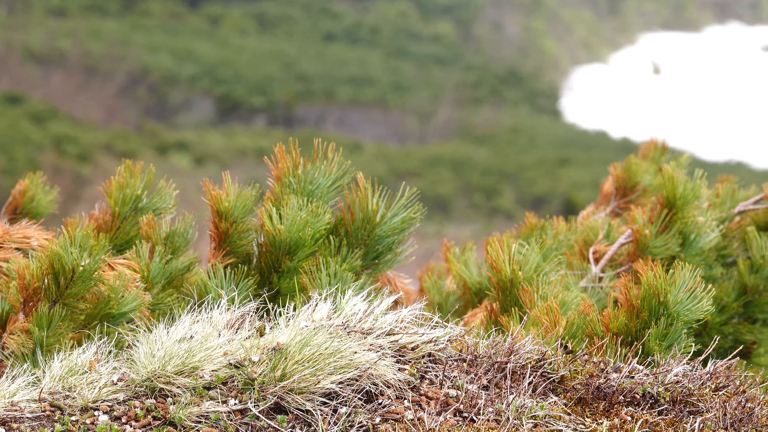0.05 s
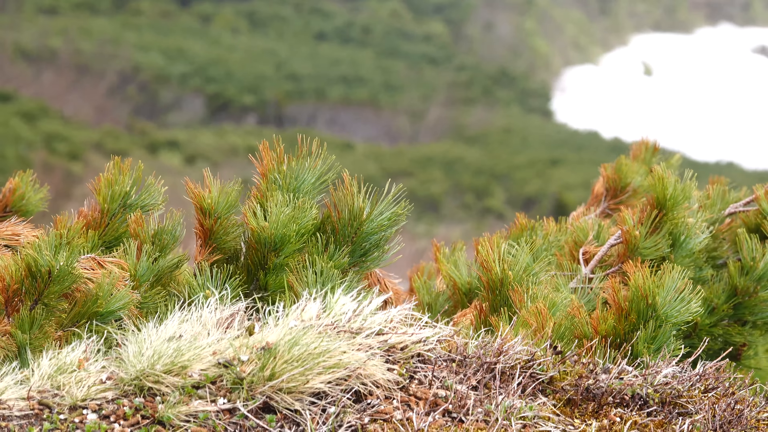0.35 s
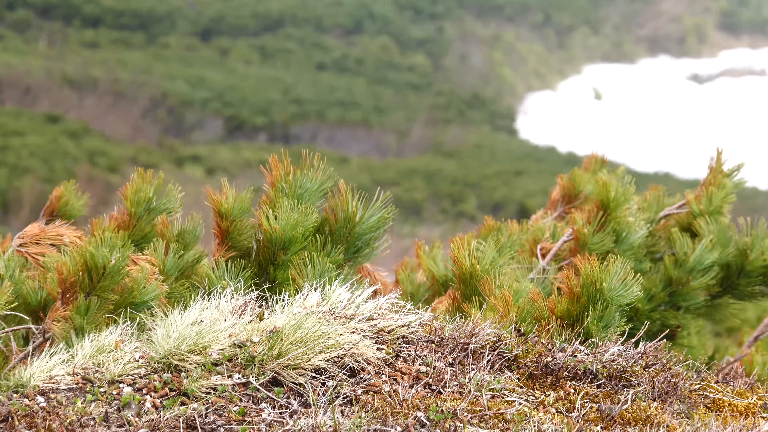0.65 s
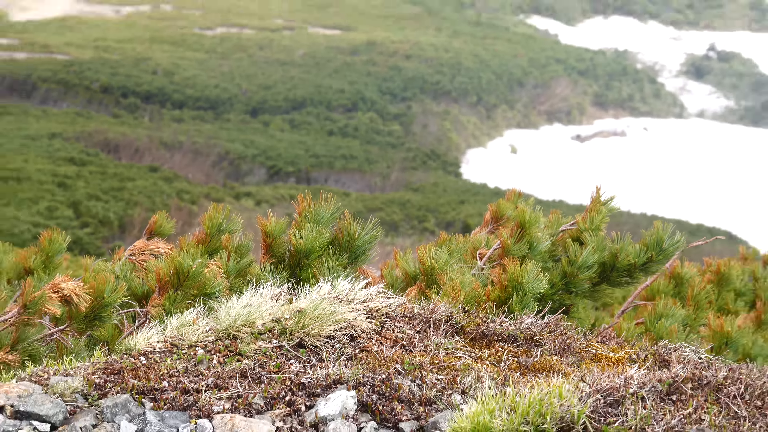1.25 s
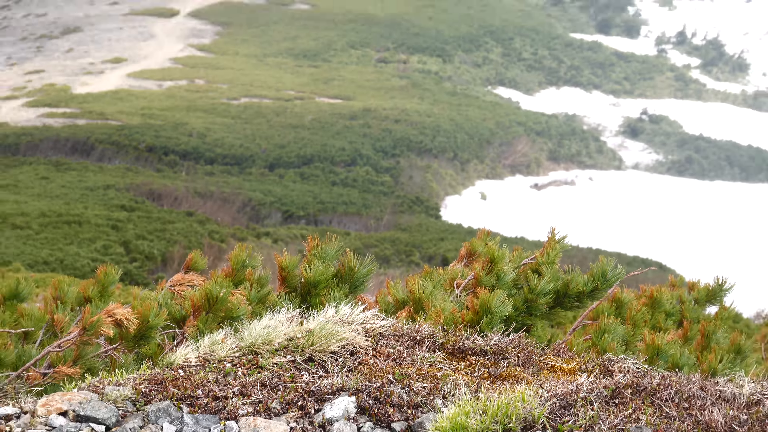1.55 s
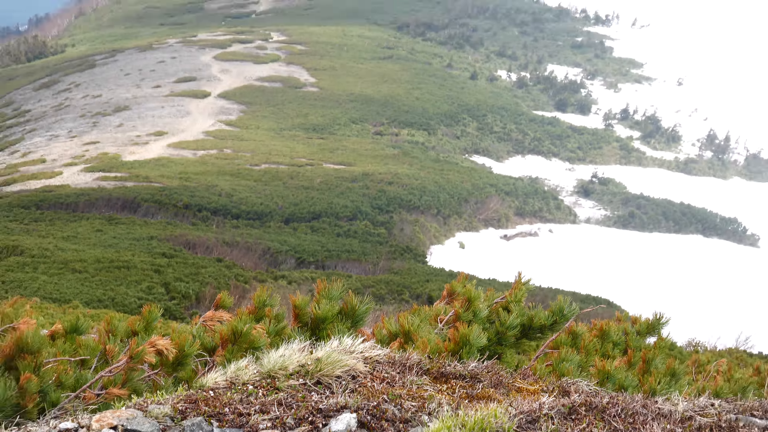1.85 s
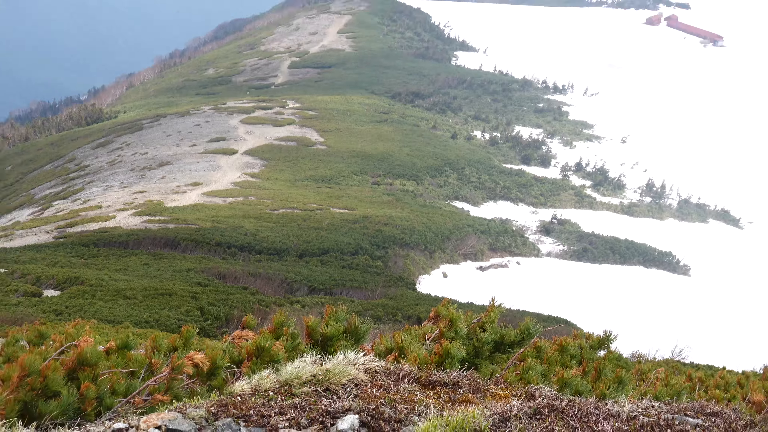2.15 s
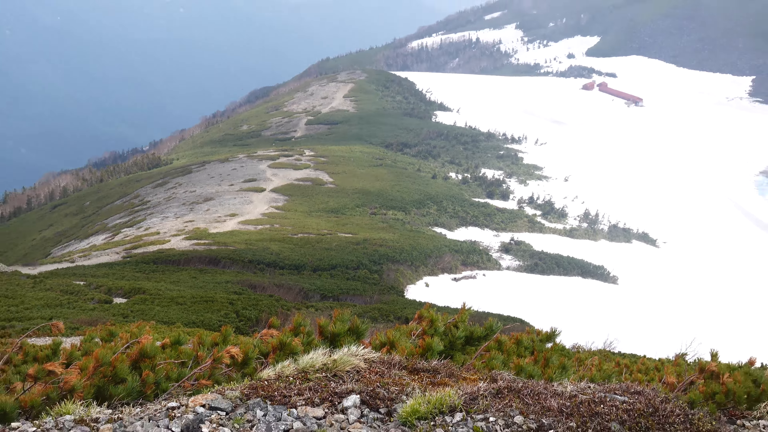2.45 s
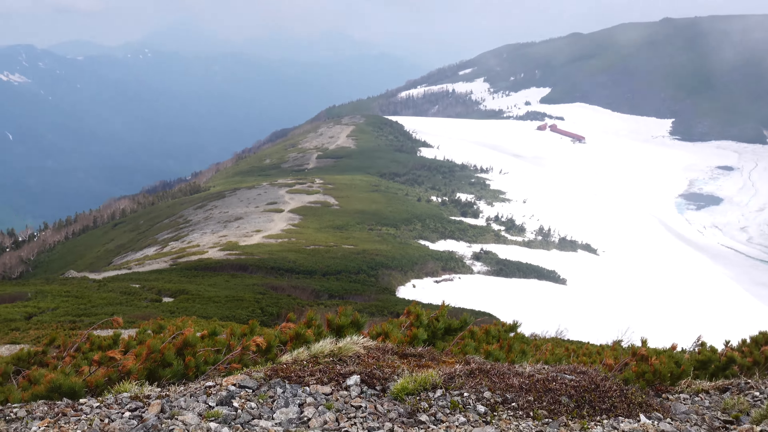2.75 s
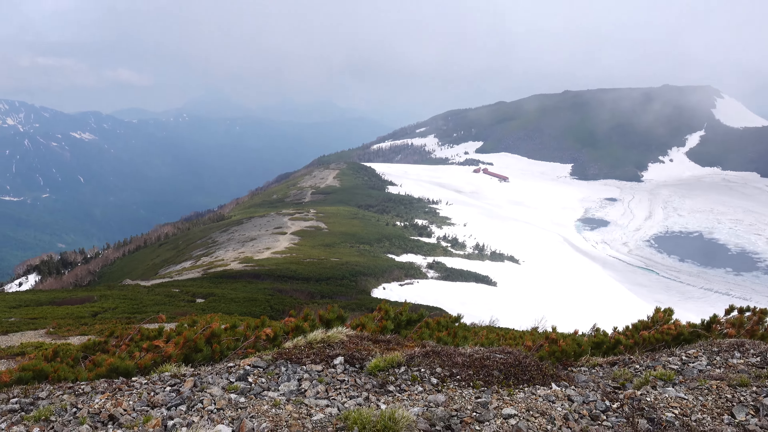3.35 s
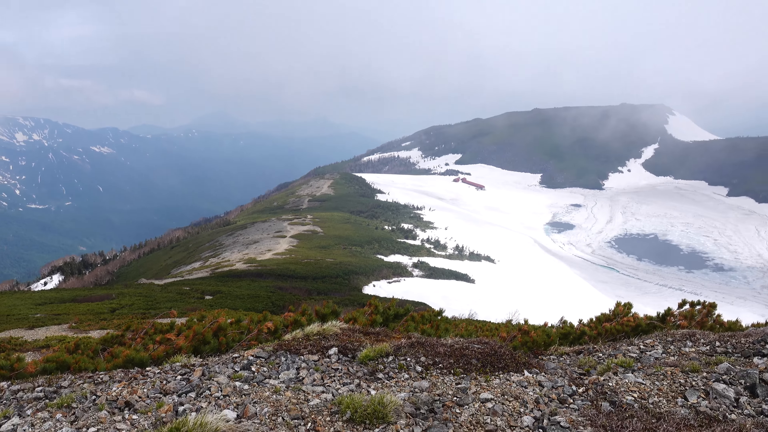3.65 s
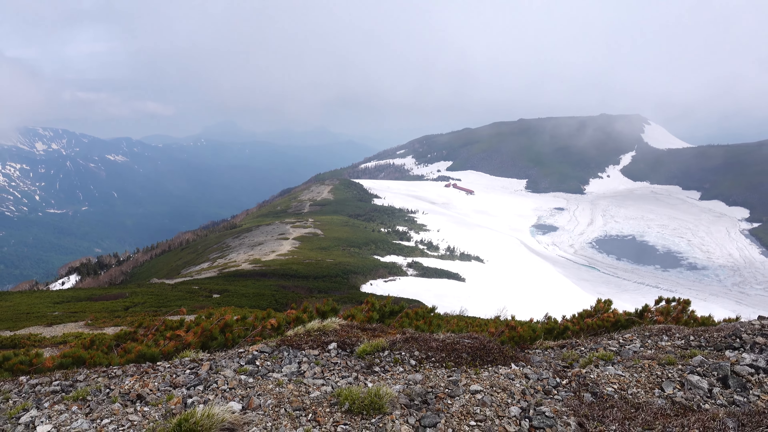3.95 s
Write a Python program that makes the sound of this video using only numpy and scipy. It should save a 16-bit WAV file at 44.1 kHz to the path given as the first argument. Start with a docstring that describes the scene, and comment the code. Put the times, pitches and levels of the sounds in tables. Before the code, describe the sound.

A ptarmigan close to the microphone gives four dry, rattling croaks on a mountain slope, while a far songbird whistles faintly among them. Afterwards only light wind and the hiss of distant water remain.

```python
"""A ptarmigan close by gives four dry, rattling croaks on a mountain slope: pulse trains that excite the
resonances of its throat, loud enough to overload the microphone. Distant water hisses, and a light wind
rumbles and twice bumps the microphone. Soft rustles sound near the bird, and a far songbird whistles
almost pure tones among the croaks."""
import sys
import numpy as np
from scipy import signal
from scipy.fft import rfft, irfft, next_fast_len
from scipy.io import wavfile
from scipy.ndimage import map_coordinates

SR = 44100
rng = np.random.default_rng(int(sys.argv[2]) if len(sys.argv) > 2 else 0)


def put_to_file(sound):
    """Save the sound as 16-bit audio at rate SR, in the file named by the first command-line argument."""
    columns = np.atleast_2d(sound).T  # one column per channel
    safe = np.clip(columns, -1, 1)
    whole_steps = np.round(safe * 32767)
    wavfile.write(sys.argv[1], SR, whole_steps.astype(np.int16))


N = 176400


def amp(db):
    """Decibels to amplitude ratio."""
    return 10 ** (np.asarray(db) / 20)


def along(points, hz):
    """Interpolation on a logarithmic frequency axis."""
    f, v = np.transpose(points)
    return np.interp(np.log(hz + 1), np.log(f + 1), v)


def curve(rows):
    """Linear interpolation in time, one value per sample."""
    return np.interp(np.arange(N) / SR, *np.transpose(rows))


def wobble(rate):
    """Smooth random modulation: a spline with rate knots a second."""
    return map_coordinates(rng.standard_normal(int(N * rate / SR) + 4), [np.arange(N) * rate / SR])


def filtered(x, response):
    """Linear filtering: the spectrum times a frequency response."""
    m = next_fast_len(N + SR // 2)
    return irfft(rfft(x, m) * response(np.fft.rfftfreq(m, 1 / SR)), m)[..., :N]


def noise(colour, alike):
    """Coloured stereo noise of rms 1; alike is the left-right correlation, a number or a table."""
    def response(hz):
        correlation = alike + 0 * hz if np.isscalar(alike) else along(alike, hz)
        angle = np.arccos(np.clip(correlation, -1, 1)) / 2
        return amp(along(colour, hz)) * [np.cos(angle), np.sin(angle)]
    mid, side = filtered(rng.standard_normal((2, N)), response)
    stereo = np.array([mid + side, mid - side])
    return stereo / np.sqrt(np.mean(stereo ** 2) + 1e-20)


def panned(x, pan_db):
    """Direction by level difference: left exceeds right by pan_db."""
    return x * np.array([np.atleast_1d(amp(pan_db / 2)), np.atleast_1d(amp(-pan_db / 2))])


def ring(gain):
    """The minimum-phase impulse response of a magnitude spectrum."""
    cepstrum = irfft(np.log(gain + 1e-6))
    half = len(cepstrum) // 2
    causal = cepstrum * np.r_[1, np.full(half - 1, 2), np.zeros(half)]
    return irfft(np.exp(rfft(causal)))


def swells(rows):
    """An envelope of superposed Gaussian swells."""
    t = np.arange(N) / SR
    return sum(amp(db) * np.exp(-.5 * ((t - s) / sigma) ** 2) for s, sigma, db in rows)


# Envelope of the hiss (time [s], relative level [dB])
WATER_LEVEL = [(1.7, -55), (2.38, -53), (2.52, -56), (3.72, -53.5), (4.0, -54.5)]
# Its spectrum (frequency [Hz], gain [dB])
WATER_SPECTRUM = [(300, -24), (1200, -16), (1850, -5.5), (2150, 3.5), (2400, 0), (2750, -1), (3080, 4),
                  (4100, -2.5), (4600, -0.5), (5000, 1), (5600, -4), (6900, -3.5), (9000, -11),
                  (11000, -20.5), (16000, -6)]
# Likeness of left and right (frequency [Hz], correlation [1])
WATER_CORRELATION = [(500, .9), (2000, 0.45), (4000, 0.9), (8000, 0.38), (15000, 0)]


def water():
    """Distant running water radiates broadband noise, heard as an even hiss."""
    level_db = curve(WATER_LEVEL) + 9.5 + 0.74 * wobble(2.7)
    return panned(amp(level_db) * noise(WATER_SPECTRUM, WATER_CORRELATION), pan_db=-0.5)


# Envelopes of the wind's three bands (time [s], level [dB])
BREEZE_LEVEL = [(0, -43.5), (1.7, -52), (2.3, -49.5), (2.7, -54.5), (3.1, -51.5), (3.5, -47), (4, -49.5)]
DRONE_LEVEL = [(0, -50.5), (1.5, -47), (2.4, -46.5), (2.7, -45.5), (3.3, -44), (4, -43.5)]
RUMBLE_LEVEL = [(0, -40), (.9, -40), (1.6, -40), (2.3, -39.5), (2.7, -42), (3.3, -40), (4, -41)]
# Their spectra (frequency [Hz], gain [dB])
BREEZE_SPECTRUM = [(100, -28), (400, 3), (600, -2.5), (790, 1.5), (920, -0.5), (1070, 0.5), (1600, -5),
                   (3000, -9), (8000, -44)]
DRONE_SPECTRUM = [(80, -27), (120, -14.5), (165, -6), (210, -12.5), (280, -4.5), (322, -1.5), (370, -17),
                  (480, -18), (1000, -39)]
RUMBLE_SPECTRUM = [(10, -20), (30, 2), (55, -9.5), (75, -0.5), (110, -4), (150, -11), (200, -23.5),
                   (400, -27), (1000, -37)]


def wind(gust_db=1, buffet_db=1.3):
    """Gusts modulate the amplitude of three noise bands: a breeze, a hollow drone and a rumble."""
    breeze = amp(curve(BREEZE_LEVEL) + gust_db * wobble(6.52)) * noise(BREEZE_SPECTRUM, alike=0.48)
    drone = amp(curve(DRONE_LEVEL) + gust_db * wobble(11)) * noise(DRONE_SPECTRUM, alike=0.68)
    buffeting = buffet_db * np.array([wobble(10), wobble(7.97)])
    rumble = amp(curve(RUMBLE_LEVEL) + buffeting) * noise(RUMBLE_SPECTRUM, alike=-0.2)
    return breeze + drone + rumble


def croak(rows, throat, colour, air_db, size=2048):
    """Source and filter: pulses and rushing air excite the throat's moving resonances (formants)."""
    scatter_db, detune_per_hz, jitter_s = .55, .000003, .00016
    rasp_db, rasp_t60_s = -31, .02
    snap_db, lead = -30, round(0.001458 * SR)
    times, rate, level, shift = np.transpose(rows)
    t = np.arange(times[0], times[-1], 1 / SR)
    cycles = np.cumsum(np.interp(t, times, rate)) / SR
    hz, age = np.fft.rfftfreq(size, 1 / SR), np.arange(size) / SR
    out = np.zeros(N)
    for at in np.interp(np.arange(int(cycles[-1]) + 1), cycles, t):
        gain = amp(along(colour, hz) + np.interp(at, times, level) + rng.normal(0, scatter_db))
        for centre, travel, width, boost_db in throat:
            formant_hz = centre + travel * np.interp(at, times, shift)
            formant_hz *= 1 + rng.normal(0, detune_per_hz * centre)
            gap, damping = formant_hz ** 2 - hz ** 2, 1j * hz * width
            gain = gain * np.abs((gap + damping * amp(boost_db)) / (gap + damping))
        period = 1 / np.interp(at, times, rate)
        flow = amp(rasp_db - 60 * age / rasp_t60_s) + amp(air_db) * (age < period)
        drive = flow * np.diff(rng.standard_normal(size + 1))
        drive[0] += amp(snap_db)  # the membrane snaps open just before the pulse
        drive[lead] += 1
        start = max(round((at + rng.normal(0, jitter_s)) * SR) - lead, 0)
        out[start:][:size] += signal.fftconvolve(drive, ring(gain))[:size]
    return out


# Pulse trains (time [s], pulse rate [Hz], relative level [dB], throat shift [1])
OPEN_PULSES = [(.0093, 65.3, 2, 0), (.1, 65.8, 1.5, .15), (.19, 61, .5, .4), (.262, 58, -.5, .6),
               (.297, 56, -2, 1.2), (.304, 40, -20, 1), (.33, 36, -21, 1)]
SECOND_PULSES = [(.5021, 59, -10, 0), (.522, 63, -.5, 0), (.585, 70, 0, .3), (.64, 63, -.5, .55),
                 (.672, 57, -1.5, 1), (.697, 42, -23, .8)]
SHORT_PULSES = [(1.0237, 61, -6, 1.15), (1.0408, 56, -1, 1), (1.063, 50, -8.5, .7)]
LAST_PULSES = [(1.2376, 44, -9, .3), (1.29, 64.5, -4.5, .35), (1.37, 61, -7.3, .65), (1.45, 52.6, -9, .65),
               (1.53, 49.5, -11, .9), (1.585, 45, -15, 1.2), (1.612, 44, -23, 1.5)]
# Throat resonances (frequency [Hz], travel per unit shift [Hz], bandwidth [Hz], boost [dB])
OPEN_FORMANTS = [(1256, -31, 99, 9.5), (1678, -60, 94, 7), (3970, -230, 180, 17.5), (4790, -150, 126, 14),
                 (7720, -200, 170, 10)]
NASAL_FORMANTS = [(1054, 78, 113, 15.5), (2156, -235, 147, 13.85), (2548, 330, 142, 11),
                  (5630, -700, 260, 9.5)]
# Spectral envelope of one pulse (frequency [Hz], gain [dB])
OPEN_SPECTRUM = [(100, -10.5), (300, 8), (550, 12.5), (800, 19), (1050, 19.5), (1450, 24.5), (1950, 17),
                 (3000, 0.5), (4400, -1.5), (5800, -5.5), (7300, -6.5), (11000, -44), (16000, -62)]
NASAL_SPECTRUM = [(100, -3), (300, 2), (550, 6), (850, 13.5), (1450, 14), (2000, 14.5), (2850, 10),
                  (3300, -1.5), (3900, -6), (5000, 1.5), (6400, -12.5), (7600, -13), (11000, -41),
                  (16000, -42)]
# Direction of the bird (time [s], left minus right [dB])
BIRD_PAN = [(0, -5), (.6, -4.5), (1.05, -6.5), (1.4, -6)]


def ptarmigan(smear_hz=1560):
    """Formants set the timbre: one open croak and three nasal ones, a little to the right."""
    voice = croak(OPEN_PULSES, OPEN_FORMANTS, OPEN_SPECTRUM, air_db=-38)
    for rows, db in ((SECOND_PULSES, -0.9), (SHORT_PULSES, -1.8), (LAST_PULSES, -1.5)):
        voice += amp(db) * croak(rows, NASAL_FORMANTS, NASAL_SPECTRUM, air_db=-41)
    # all-pass: the lows of each pulse lag behind its highs
    voice = filtered(voice, lambda hz: (1j * hz - smear_hz) / (1j * hz + smear_hz))
    return panned(voice, curve(BIRD_PAN)) + amp(-23) * slope_scatter(voice)


# Decay of the scattered sound (frequency [Hz], time to fall 60 dB [s])
SLOPE_DECAY = [(300, 0.02), (1500, 0.071), (5000, 0.027), (12000, 0.014)]


def slope_scatter(x):
    """Diffuse scattering from scrub and stones adds a brief, exponentially decaying tail."""
    hz, t, spectra = signal.stft(rng.standard_normal((2, SR // 4)), SR, nperseg=256)
    decay = amp(-60 * t / along(SLOPE_DECAY, hz)[:, None])
    tail = signal.istft(spectra * decay, SR, nperseg=256)[1]
    return signal.fftconvolve(x[None], tail / np.linalg.norm(tail[0]), axes=1)[:, :N]


# Rustles near the bird (peak time [s], Gaussian width [s], level [dB])
RUSTLE_SWELLS = [(.332, 0.021, -37.5), (.407, 0.0043, -30.5), (.487, 0.01, -31.5)]
# Their spectrum (frequency [Hz], gain [dB])
RUSTLE_SPECTRUM = [(100, 7), (400, 3.5), (1200, -1), (2500, -6.5), (5000, -6.5), (8000, -20), (16000, -31)]


def rustles():
    """Short envelopes on broadband noise are heard as soft rustles."""
    return swells(RUSTLE_SWELLS) * noise(RUSTLE_SPECTRUM, alike=0.75)


# Wind bumps (peak time [s], Gaussian width [s], level [dB])
BUMP_SWELLS = [(.512, 0.017, -21.5), (2.905, 0.025, -35.5)]
# Their spectrum (frequency [Hz], gain [dB])
BUMP_SPECTRUM = [(30, -12), (70, -5.5), (118, 6.5), (175, -17.5), (300, -0.5), (440, -14.5), (600, -27),
                 (900, -42), (3000, -91)]
# Likeness of left and right (frequency [Hz], correlation [1])
BUMP_CORRELATION = [(130, -0.48), (280, 0.94)]


def wind_bumps():
    """Wind pressure on the microphone makes two bursts of low-frequency noise."""
    return swells(BUMP_SWELLS) * noise(BUMP_SPECTRUM, BUMP_CORRELATION)


# Notes (onset [s], duration [s], first pitch [Hz], middle pitch [Hz], last pitch [Hz], level [dB])
SONG_NOTES = [(0.677, 0.24, 2085, 2104, 2095, -39), (0.943, .085, 1750, 1630, 1640, -41),
              (1.077, 0.065, 2130, 2090, 2050, -36.5), (1.142, .035, 3100, 3050, 2880, -36),
              (1.25, 0.04, 3540, 2150, 1590, -32)]


def songbird(fade_s=0.023, waver=0.006):
    """Frequency-modulated sine tones: one long far whistle, then four quick notes."""
    t, song = np.arange(N) / SR, np.zeros(N)
    for start, length, first, middle, last, db in SONG_NOTES:
        progress = np.clip((t - start) / length, 0, 1)
        glide = np.polyfit([0, .5, 1], [first, middle, last], 2)
        hz = np.polyval(glide, progress) * (1 + waver * wobble(59.1))
        fade = np.clip(np.minimum(progress, 1 - progress) * length / fade_s, 0, 1)
        song += fade * amp(db + 1.4 * wobble(23.2)) * np.sin(2 * np.pi * np.cumsum(hz) / SR)
    return panned(song, pan_db=-3.0)


def scene():
    """Superposition: the near bird adds to the quieter sounds of the slope."""
    return ptarmigan() + songbird() + water() + wind() + wind_bumps() + rustles()


# The microphone's dull treble (frequency [Hz], gain [dB])
MIC_RESPONSE = [(7500, 0.5), (10000, 1), (13000, -5), (16000, -10.5)]


def record(dry):
    """Saturation flattens the loudest pulses at full scale; a band limit follows."""
    top_hz = 16000
    clipped = dry / (1 + np.abs(dry) ** 6) ** (1 / 6)
    return filtered(clipped, lambda hz: amp(along(MIC_RESPONSE, hz)) * (hz < top_hz))


dry = scene()
out = record(dry)
put_to_file(out)
```